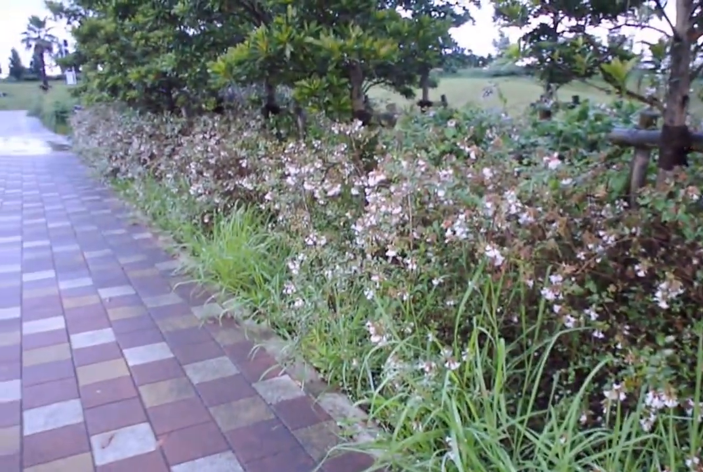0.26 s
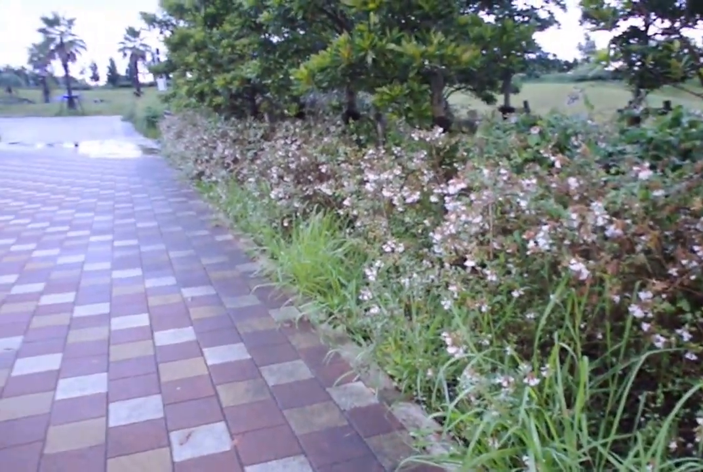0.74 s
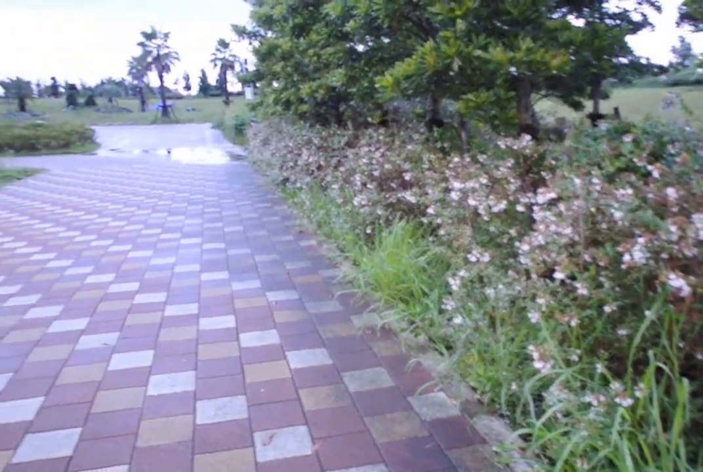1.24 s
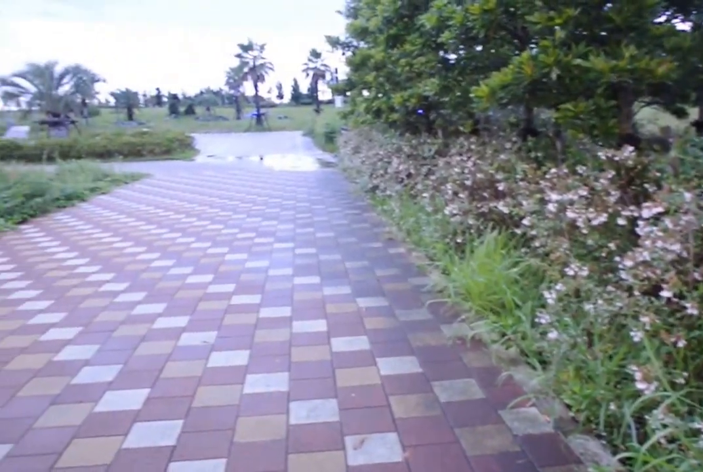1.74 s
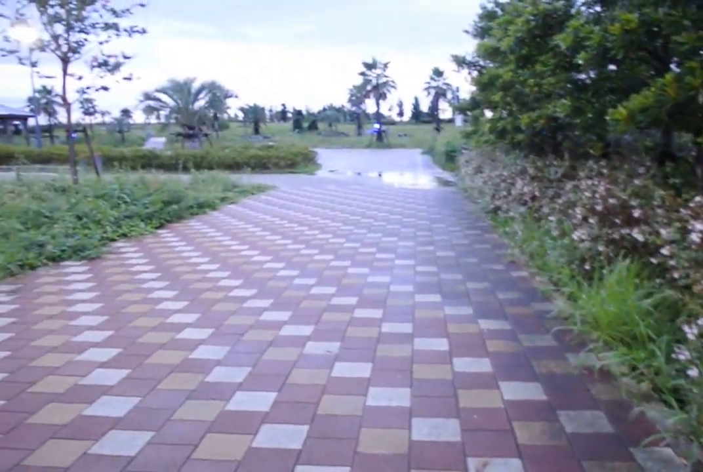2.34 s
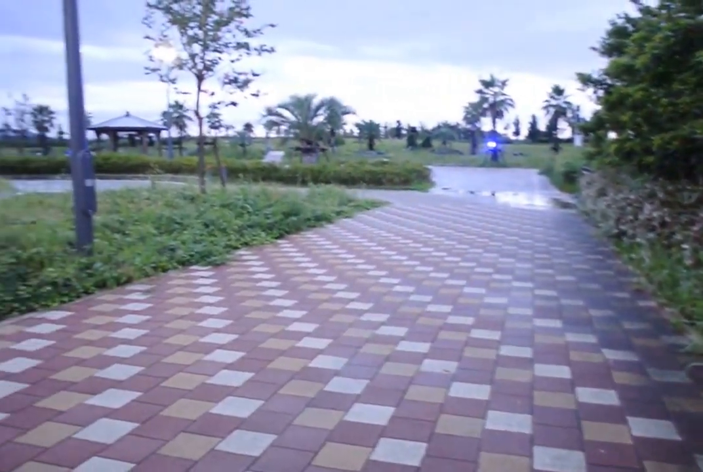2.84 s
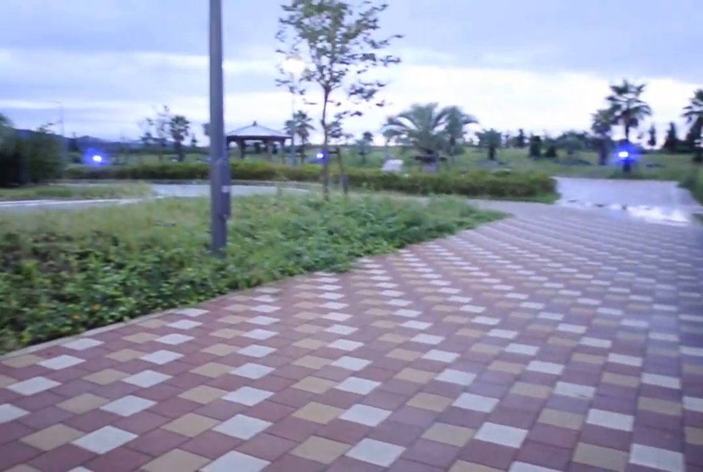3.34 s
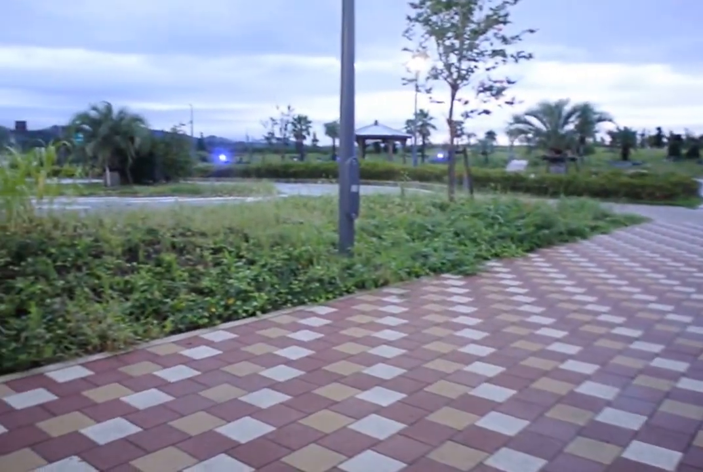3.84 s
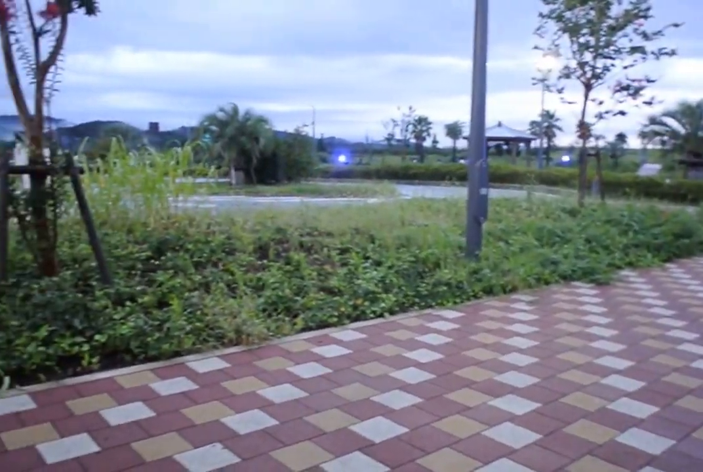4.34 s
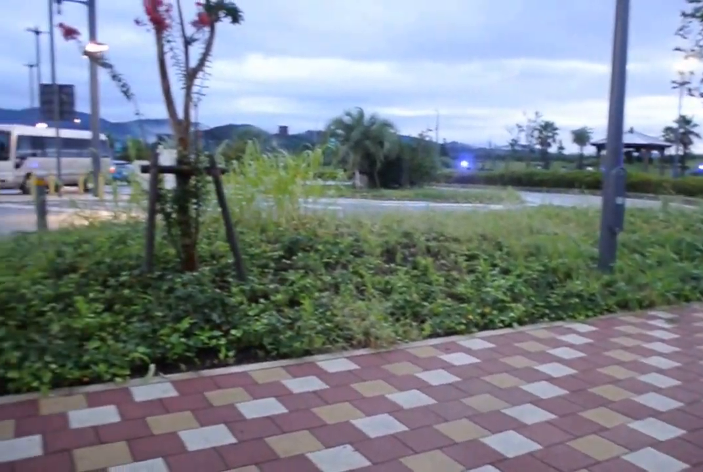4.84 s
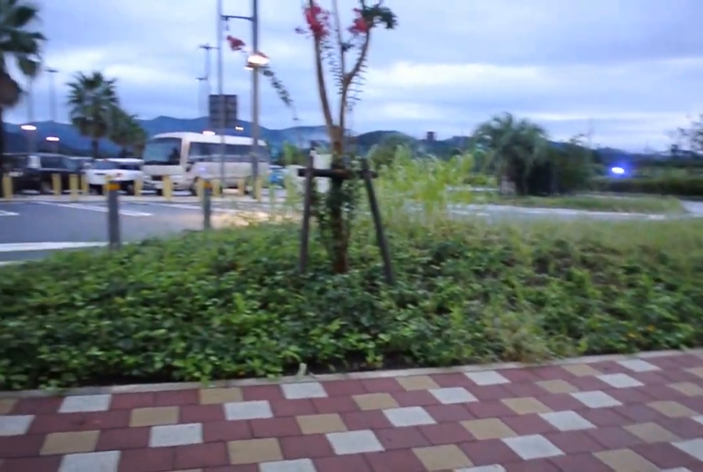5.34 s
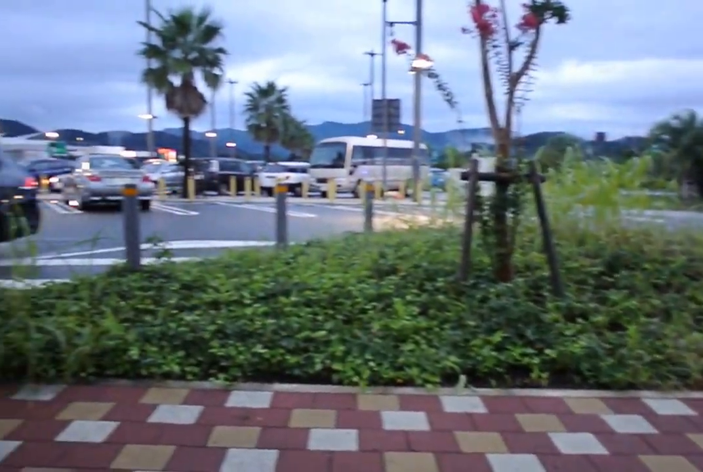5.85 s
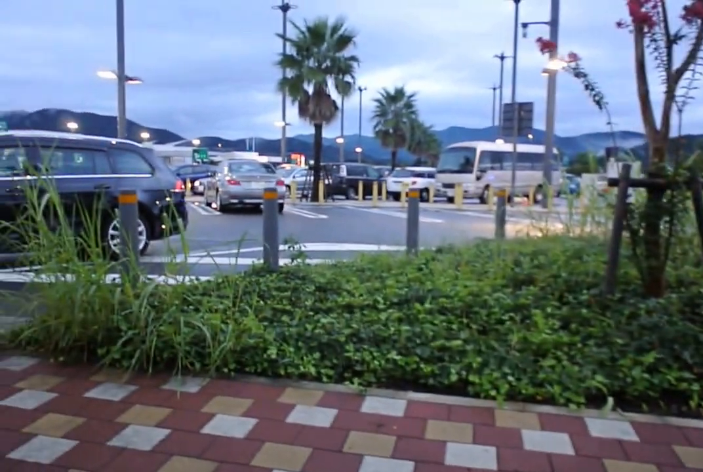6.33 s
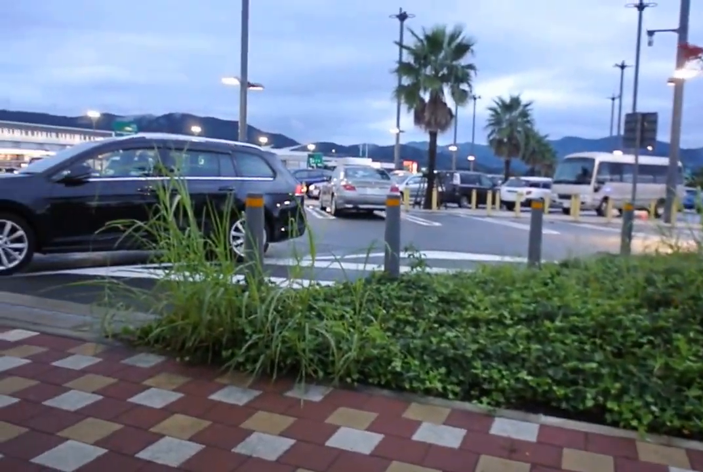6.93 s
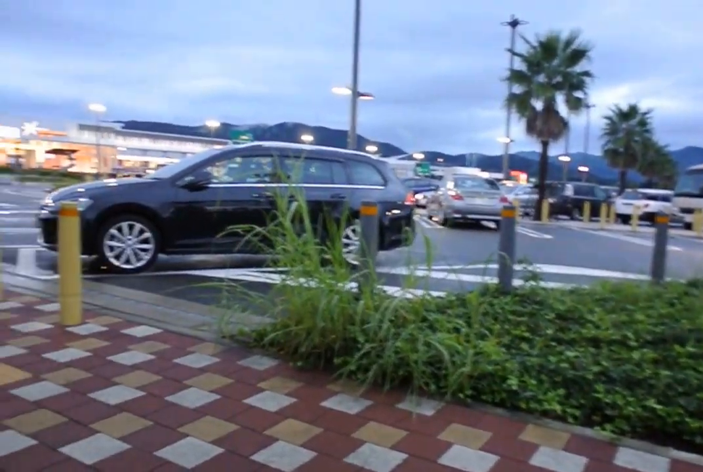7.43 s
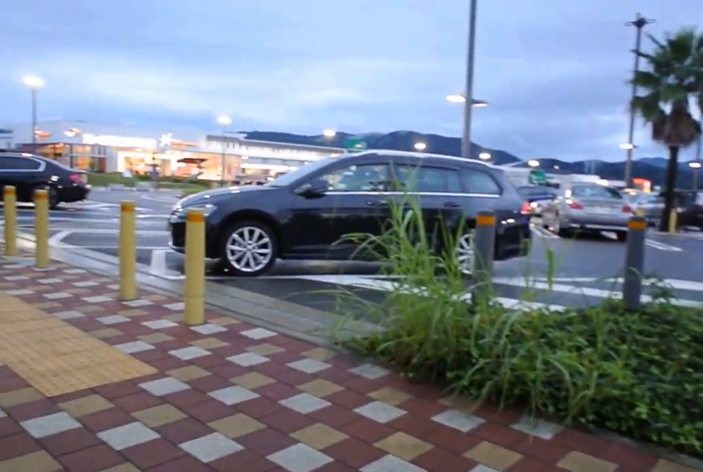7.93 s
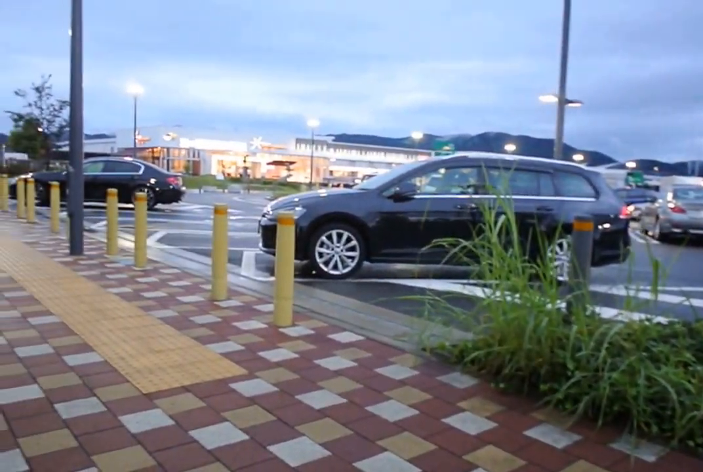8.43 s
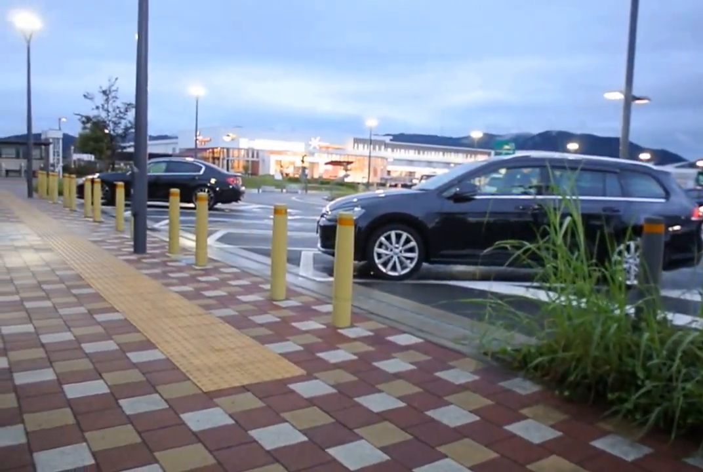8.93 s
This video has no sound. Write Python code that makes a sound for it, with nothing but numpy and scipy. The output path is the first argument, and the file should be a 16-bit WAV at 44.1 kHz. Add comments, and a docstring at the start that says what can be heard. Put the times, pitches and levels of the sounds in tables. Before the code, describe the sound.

A high, ringing chorus of crickets, with one pulsing loudly nearby at the start and soft traffic hum behind.

```python
"""Crickets trill all around a paved path at dusk, one of them very close at first.
A cricket scrapes one wing along a ridged file on the other: each stroke is a short falling tone
near 4.5 kHz. Another kind of cricket adds a few higher notes, and a shoe scuffs now and then.
Distant traffic and idling engines hum as the microphone turns from a hedge towards a car park."""
import sys
import numpy as np
from scipy import signal
from scipy.fft import rfft, irfft
from scipy.io import wavfile
from scipy.ndimage import uniform_filter1d

SR = 44100
rng = np.random.default_rng(int(sys.argv[2]) if len(sys.argv) > 2 else 0)


def store_wav(level_fs):
    """Save 16-bit WAV to argv[1]."""
    pcm = np.round(np.clip(np.atleast_2d(level_fs), -1, 1) * 32767)
    wavfile.write(sys.argv[1], SR, pcm.T.astype(np.int16))


N = 404838
TIME = np.arange(N) / SR


def from_db(db):
    """Turn decibels into a number to multiply by."""
    return 10 ** (np.asarray(db) / 20)


def rms_one(x):
    """Scale a sound so its average level (rms) is 1."""
    return x / np.sqrt(np.mean(x ** 2) + 1e-20)


def in_time(rows, t=TIME):
    """Read each column at times t, drawing straight lines between rows."""
    seconds, *columns = np.transpose(rows)
    return [np.interp(t, seconds, column) for column in columns]


def drift(hz):
    """Wander around zero, heading for a new random value hz times a second."""
    targets = rng.standard_normal(1024)
    return np.interp(TIME * hz, np.arange(len(targets)), targets)


def noise(spectrum, likeness):
    """Stereo noise of a given colour; a likeness of 1 makes left and right the same."""
    hz, db = np.transpose(spectrum)
    grid = np.maximum(np.arange(N // 2 + 1) * SR / N, 1)
    gain = from_db(np.interp(np.log(grid), np.log(hz), db, left=-80, right=-80))
    mid, side = irfft(rfft(rng.standard_normal((2, N))) * gain, N)
    return rms_one(np.sqrt(1 + likeness) * mid + np.sqrt(1 - likeness) * side * [[1], [-1]])


def stereo_phase(phase, side, hz, delay_s=8e-5):
    """A tone reaches the nearer side of the microphone first; side is -1 (right) to 1 (left)."""
    return phase + np.pi * hz * delay_s * side * np.array([[1], [-1]])


def scatter(x, fade_s, echo_db):
    """Leaves and paving add a cloud of echoes that fades by 60 dB in fade_s."""
    t = np.arange(SR // 3) / SR
    echoes = rng.standard_normal((2, len(t))) * from_db(-60 * t / fade_s) * (t > .002)
    echoes /= np.sqrt(np.sum(echoes ** 2, axis=1, keepdims=True))
    return x + from_db(echo_db) * signal.oaconvolve(x, echoes, axes=1)[:, :N]


def stroke_times(first, last, strokes_per_s=26.7):
    """The wings close at an even pace through a phrase."""
    return np.linspace(first, last, int(round((last - first) * strokes_per_s)) + 1)


def wing_tone(phase, second_db, third_db):
    """The wing rings almost purely, with weak overtones at two and three times its pitch."""
    return np.sin(phase) + from_db(second_db) * np.sin(2 * phase) + from_db(third_db) * np.sin(3 * phase)


# The top overtone grows as a stroke slows. Each row: seconds from the peak, boost in dB.
OVERTONE_SWELL = [(-.012, 0), (0, 0), (.006, 3), (.012, 5)]

def wing_strokes(strokes, shape, second_db, third_db, wobble):
    """The scraper slows as it runs along the wing file, so each stroke is a falling tone."""
    t = np.arange(shape[0][0], shape[-1][0], 1 / SR)
    out = np.zeros((2, N + 2 * SR))  # a spare second at each end
    level_db, glide = in_time(shape, t)
    swell = from_db(level_db)
    bright_db = third_db + in_time(OVERTONE_SWELL, t)[0]
    for (peak_s, hz, db, side), luck in zip(strokes, rng.standard_normal((len(strokes), 10))):
        uneven = 1 + wobble * np.interp(t, np.linspace(t[0], t[-1], len(luck)), luck)
        phase = 2 * np.pi * (np.cumsum(hz * glide * uneven) / SR + luck[0])
        tone = wing_tone(stereo_phase(phase, side, hz), second_db, bright_db)
        start = SR + int(min((peak_s + t[0]) * SR, N))
        out[:, start:start + len(t)] += from_db(db) * swell * tone
    return out[:, SR:SR + N]


# The close cricket's song. Each row: first and last stroke in seconds, level in dB.
CLOSE_PHRASES = [(-.2, 0.028, -8), (0.227, 0.449, -6), (.638, 0.864, -5.5), (1.039, 1.225, -4.5),
                 (1.467, 1.734, -4), (1.911, 2.177, -5), (2.354, 2.619, -7), (2.869, 3.057, -6)]
# One close stroke. Each row: seconds from its peak, level in dB, pitch multiplier.
CLOSE_STROKE = [(-.0095, -36, 1.002), (-.0076, -8, 1.006), (-.003, -1.5, 1.007), (.001, 0, 1.001),
                (.005, -3, .982), (.009, -8, .948), (.012, -16, .908), (.015, -40, .87)]
# The scrape of the wing file. Each row: frequency in Hz, strength in dB.
FILE_RASP = [(2500, -18), (5000, 10), (7800, -2.5), (9300, 10), (10000, -20), (15000, -16)]

def close_cricket():
    """Bursts of about seven strokes from the hedge on the right, each with a faint rasp."""
    strokes = []
    for first, last, db in CLOSE_PHRASES:
        times = stroke_times(first, last)
        # a phrase opens low and soft, then the wings lock on to full pitch
        opening = np.exp(-((times - first) / .0557) ** 4)
        luck = rng.standard_normal((len(times), 2))
        pitch_hz = 4622 - 142 * opening + 11.5 * luck[:, 0]
        level_db = db - 5 * opening - .4 * luck[:, 1]
        strokes += zip(times, pitch_hz, level_db, np.full(len(times), -.68))
    song = wing_strokes(strokes, CLOSE_STROKE, second_db=-32, third_db=-28, wobble=.0012)
    effort = uniform_filter1d(np.abs(song[0]), size=64) * from_db(3 * drift(25))
    rasp = from_db(-28) * effort * noise(FILE_RASP, likeness=-.1)
    lean_right = from_db([[-.3], [.3]])
    return scatter((song + rasp) * lean_right, fade_s=.06, echo_db=-16)


# The far crickets. Each entry: one cricket's pitch in Hz.
CHORUS_HZ = [4290, 4390, 4450, 4480, 4495, 4515, 4555, 4600, 4645]
# One far stroke. Each row: seconds from its peak, level in dB, pitch multiplier.
FAR_STROKE = [(-.014, -35, 1.004), (-.01, -9, 1.006), (-.004, -1, 1.005), (.001, 0, 1.001),
              (.006, -4, .989), (.01, -12, .966), (.015, -34, .92)]
# Where most crickets are as the microphone turns. Each row: time in seconds, side.
CRICKET_SIDE = [(0, -0.83), (4, -0.71), (5.4, -0.85), (6.2, 0.94), (9.18, 0.61)]
# The farthest crickets blur into a steady ring. Each row: frequency in Hz, strength in dB.
FAR_RING = [(3850, -26), (4150, -1.5), (4360, -15), (4440, -16), (4500, 3), (4580, -32), (4660, 7),
            (4780, -3.5), (4920, -31)]

def chorus():
    """Far crickets, each with its own pitch and pace, swelling and easing in turn."""
    song = np.zeros((2, N))
    for hz in CHORUS_HZ:
        luck = rng.standard_normal((280, 3))
        strokes_per_s = 27 + .7 * rng.standard_normal()
        times = np.cumsum(1 + .025 * luck[:, 0]) / strokes_per_s - rng.random() / 27
        phrase_db = 3.2 * np.sin(2 * np.pi * (times * rng.uniform(1.7, 2.6) + rng.random()))
        sides = in_time(CRICKET_SIDE, times)[0] + .38 * rng.standard_normal()
        pitch_hz = hz * (1 + .0027 * luck[:, 1])
        strokes = list(zip(times, pitch_hz, phrase_db + .64 * luck[:, 2], sides))
        song += wing_strokes(strokes, FAR_STROKE, second_db=-28, third_db=-28, wobble=.0027)
    song = rms_one(scatter(song, fade_s=.12, echo_db=-5))
    return song + from_db(-10) * noise(FAR_RING, likeness=.05)


def thin_trill(hz=5175):
    """A faint cricket deep in the hedge, its strokes almost joined; it fades as the microphone turns."""
    level_db, = in_time([(0, -42), (1.5, -47), (3, -47), (5, -51), (6.5, -62), (9.18, -60)])
    throb = np.sin(2 * np.pi * np.cumsum(36 + 2 * drift(8)) / SR)
    phase = 2 * np.pi * np.cumsum(hz + 50 * drift(150) + 35 * throb) / SR
    song = from_db(level_db + 4.5 * throb) * np.sin(stereo_phase(phase, side=-.56, hz=hz))
    return scatter(song, fade_s=.12, echo_db=-8)


# The hiss of far insects. Each row: frequency in Hz, strength in dB.
INSECT_WASH = [(3300, -12), (3900, 3.5), (4900, 3), (5450, 2.5), (5700, 4), (6300, -6.5), (7000, 1),
               (7500, -0.5), (8300, 2), (9300, -7), (9750, -8.5), (11900, -12), (12600, -22), (13500, -19),
               (13900, -15), (14100, -29)]

def insect_wash():
    """Far insects blend into a high, flickering hiss."""
    level_db, = in_time([(0, -37), (3, -39.5), (5, -41), (9.18, -41.5)])
    return from_db(level_db + 1.4 * drift(29)) * noise(INSECT_WASH, likeness=-.42)


# How the traffic swells. Each row: time in seconds, then rumble, tyre and hiss levels in dB.
TRAFFIC_LEVELS = [(0.0, -57, -46, -50), (0.02, -42.5, -45, -48), (1.63, -43.5, -45.5, -47.5),
                  (2.76, -42, -45.5, -46.5), (8.34, -42.5, -45, -44.5), (9.13, -42.5, -46, -46),
                  (9.18, -43, -43, -45)]
# The colours of those three noises. Each row: frequency in Hz, strength in dB.
ENGINE_RUMBLE = [(12, -42), (20, -11), (59, -3), (97, -4.5), (129, -3.5), (173, -1), (208, -1), (278, -5.5),
                 (315, -8), (362, -9), (400, -20), (520, -44), (880, -120)]
TYRES = [(250, -26), (400, -2.5), (520, 0), (720, 0), (1000, -5.5), (1400, -9.5), (2200, -24)]
FAR_HISS = [(600, -9), (1000, -6), (1350, -1.5), (2000, -2.5), (3000, -6), (4500, -6), (6000, -9.5),
            (9000, -20.5), (14000, -9.5), (17500, -27)]

def distant_traffic():
    """Far engines rumble and tyres rush under a soft hiss."""
    rumble_db, tyre_db, hiss_db = in_time(TRAFFIC_LEVELS)
    rumble = from_db(rumble_db - 1) * noise(ENGINE_RUMBLE, likeness=.97)
    tyres = from_db(tyre_db + .83) * noise(TYRES, likeness=.88)
    hiss = from_db(hiss_db + 4.5) * noise(FAR_HISS, likeness=.51)
    return rumble + tyres + hiss


def hum(hz, waver_hz):
    """A machine tone that wavers in level and pitch."""
    waver = drift(waver_hz) + 1j * drift(waver_hz)
    phase = 2 * np.pi * np.cumsum(hz * np.ones(N)) / SR
    return rms_one((waver * np.exp(1j * phase)).real)


# A car's engine. Each row: time in seconds, drone pitch in Hz, drone level in dB, boom level in dB.
CAR_ENGINE = [(0, 236.5, -57, -59), (1.2, 236, -50.5, -56.5), (2.1, 221.4, -49, -49),
              (2.8, 211, -46.5, -43.5), (4, 208, -55, -72), (4.4, 209.9, -43, -60), (5.7, 209, -47, -56),
              (6.8, 208, -56, -51), (7.9, 209.7, -47, -61), (9.18, 206, -57, -49)]

def manoeuvring_car():
    """An engine's drone slowly sinks in pitch over a low boom."""
    drone_hz, drone_db, boom_db = in_time(CAR_ENGINE)
    return from_db(drone_db) * hum(drone_hz, waver_hz=18) + from_db(boom_db) * hum(126, waver_hz=14)


# Machine hums. Each row: pitch in Hz, waver rate in Hz, start and end level in dB.
MACHINE_HUMS = [(316.7, 6, -55.5, -57), (520, 15, -62.5, -56), (1280, 12, -71, -55.5)]

def idling_machines():
    """Idling engines and a fan hum in the car park."""
    return sum(from_db(np.linspace(start_db, end_db, N)) * hum(hz, waver_hz)
               for hz, waver_hz, start_db, end_db in MACHINE_HUMS)


# Trills from low plants. Each row: first and last stroke in seconds, pitch in Hz, level in dB,
# overtone strength in dB.
TRILLS = [(.061, .134, 4510, -16.5, -28), (0.49, .53, 4540, -8.5, -30), (1.258, 1.441, 4540, -13, -30),
          (1.768, 1.881, 4490, -32, -32), (2.211, 2.325, 4530, -17.5, -26), (2.656, 2.835, 4520, -15, -23),
          (3.111, 3.409, 4470, -18.5, -30), (3.431, 3.832, 4496, -17.5, -21),
          (3.615, 4.462, 4190, -21, -22), (3.907, 4.202, 4610, -19.5, -24), (4.226, 4.499, 4520, -15, -26),
          (4.273, 4.43, 4605, -17, -22), (4.539, 4.721, 4583, -18.5, -30), (4.704, 5.048, 4215, -21.5, -21),
          (4.77, 4.961, 4500, -20.5, -20), (5.064, 5.292, 4335, -18.5, -24),
          (5.283, 5.539, 4523, -16.5, -33), (5.575, 5.73, 4620, -26.5, -37), (5.8, 6.244, 4434, -28, -12),
          (5.834, 6.298, 4605, -26.5, -32), (6.572, 7.017, 4445, -20, -15.5),
          (7.412, 7.849, 4470, -16.5, -16.5), (7.515, 7.948, 4630, -21, -32),
          (7.979, 8.124, 4490, -15.5, -31), (8.103, 8.324, 4655, -26, -16),
          (8.218, 8.679, 4434, -20.5, -11.5), (8.474, 8.721, 4644, -21.5, -19),
          (8.715, 9.149, 4470, -20, -30), (8.878, 9.108, 4650, -21.5, -15)]

def trilling_crickets():
    """Even runs of strokes from a few steps away; pitch and level climb as each run opens."""
    song = np.zeros((2, N))
    for first, last, hz, db, overtone_db in TRILLS:
        times = stroke_times(first, last)
        opening = np.exp(-((times - first) / .066) ** 2)
        sides, = in_time(CRICKET_SIDE, times)
        luck = rng.standard_normal((64, 2))[:len(times)]
        pitch_hz = hz * (1 + .0016 * luck[:, 0]) - 113 * opening
        level_db = db - 4.5 * opening + .81 * luck[:, 1]
        strokes = list(zip(times, pitch_hz, level_db, sides))
        song += wing_strokes(strokes, FAR_STROKE, overtone_db - 3.5, overtone_db - 3, wobble=.0024)
    return scatter(from_db(.5) * song, fade_s=.07, echo_db=-10)


# Scuffs on the paving. Each row: time of the peak in seconds, level in dB.
SCUFFS = [(.385, -47), (1.415, -51), (1.475, -41.5), (3.59, -53), (3.66, -51), (4.9, -41.5)]
# The sound of grit. Each row: frequency in Hz, strength in dB.
GRIT_COLOUR = [(150, -10), (700, 1), (1500, -2), (4000, -1.5), (9000, -12), (15000, -16)]

def shoe_scuffs():
    """Grit under a turning shoe makes brief, soft bursts of noise."""
    swell = sum(from_db(db) * np.exp(-((TIME - peak_s) / .033) ** 2) for peak_s, db in SCUFFS)
    return swell * noise(GRIT_COLOUR, likeness=.98)


# The higher cricket's notes. Each row: start and end in seconds, start and end pitch in Hz,
# start and end level in dB.
HIGH_NOTES = [(2.813, 2.89, 5640, 5620, -27, -34), (3.182, 3.33, 5700, 5340, -29, -36),
              (3.457, 3.695, 5650, 5630, -34, -31), (3.585, 3.797, 5490, 5490, -27.5, -21.5),
              (7.024, 7.076, 5580, 5600, -17, -20.5), (7.392, 7.452, 5700, 5590, -18, -24.5),
              (7.719, 7.94, 5620, 5670, -21.5, -23)]

def high_cricket():
    """Strokes run together into short gliding notes, with an echo from the park."""
    song = np.zeros((2, N))
    flutter, waver = drift(90), drift(220)
    # about 28 times a second the wings turn round: the tone weakens and sags
    turn = np.sin(np.pi * (28 * TIME + .15 * drift(12))) ** 12
    for start, end, start_hz, end_hz, start_db, end_db in HIGH_NOTES:
        on = (TIME > start) & (TIME < end)
        t = TIME[on]
        hz, db = in_time([(start, start_hz, start_db), (end, end_hz, end_db)], t)
        from_edge_s = np.minimum(t - start, end - t)
        fade = np.sin(np.pi / 2 * np.minimum(from_edge_s / .009, 1))
        bend = 1.002 + .003 * waver[on] - .018 * (1 - fade) - .016 * turn[on]
        loudness = fade * from_db(db - 1 + 2 * flutter[on] - 4.5 * turn[on])
        phase = 2 * np.pi * np.cumsum(hz * bend) / SR
        side, = in_time([(0, -.4), (4, -.4), (7, .75), (9.18, .8)], t)
        song[:, on] += loudness * wing_tone(stereo_phase(phase, side, hz), second_db=-12.5, third_db=-55)
    return scatter(song, fade_s=.42, echo_db=-11)


# The mix of the crickets all around. Each row: time in seconds, chorus level in dB,
# left minus right in dB for chorus and trills together.
CRICKET_MIX = [(0.0, -22, -1.5), (0.12, -24, -3), (1.07, -29, -1.5), (1.23, -26, -1.5), (2.86, -26, -0.5),
               (3.35, -31, -1), (3.81, -26, -1.5), (5.75, -29.5, -3.5), (5.93, -23.5, 0),
               (7.36, -25.5, 2.5), (7.7, -24, 1.5), (8.64, -24.5, 2.5), (9.13, -28, 4), (9.18, -28, 0)]

def scene():
    """All the insects and the shoe scuffs, over the traffic."""
    chorus_db, balance_db = in_time(CRICKET_MIX)
    balance = from_db(np.array([balance_db, -balance_db]) / 2)
    all_around = (from_db(chorus_db + 2) * chorus() + trilling_crickets()) * balance
    insects = all_around + insect_wash() + close_cricket() + high_cricket() + thin_trill()
    return insects + shoe_scuffs() + distant_traffic() + manoeuvring_car() + idling_machines()


def record(dry, limit_db=-12.5, recovery_db_per_s=17, cutoff_hz=15800):
    """The volume dips under the loudest strokes and creeps back; the highest treble is cut off."""
    power = uniform_filter1d(np.mean(dry ** 2, axis=0), size=128)
    level_db = 10 * np.log10(np.abs(power) + 1e-12)
    cut_db = .57 * np.maximum(level_db - limit_db, 0)  # a share of whatever passes the limit
    recovery_db = recovery_db_per_s * TIME
    dip_db = np.maximum.accumulate(cut_db + recovery_db) - recovery_db
    limited = dry * from_db(-uniform_filter1d(dip_db, size=128))
    below_cutoff = np.arange(N // 2 + 1) * SR / N < cutoff_hz
    return irfft(rfft(limited) * below_cutoff, N)


dry = scene()
out = record(dry)
store_wav(out)
```